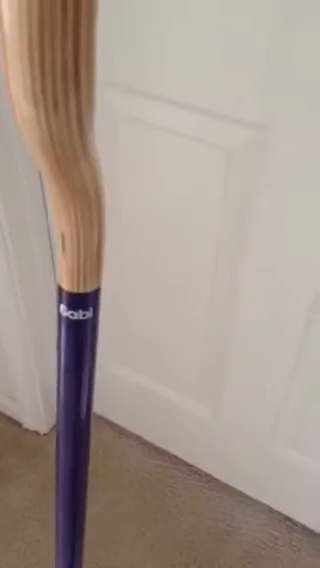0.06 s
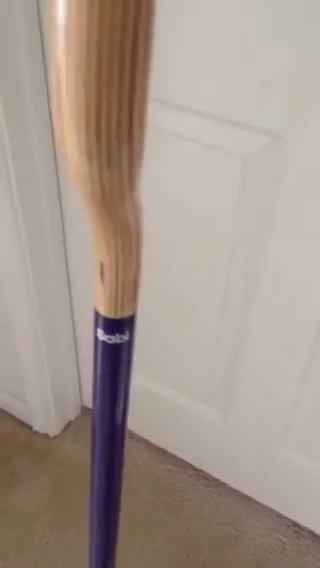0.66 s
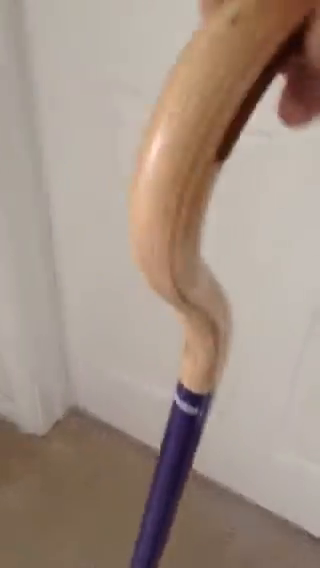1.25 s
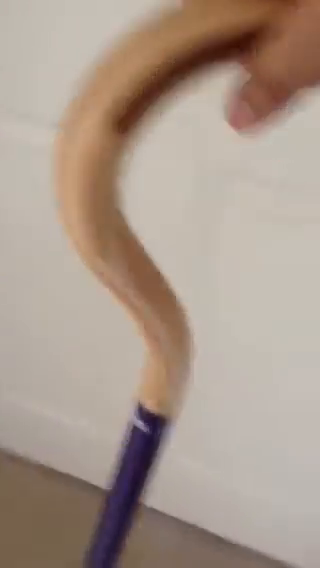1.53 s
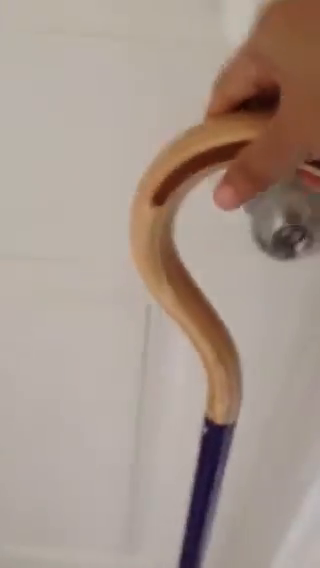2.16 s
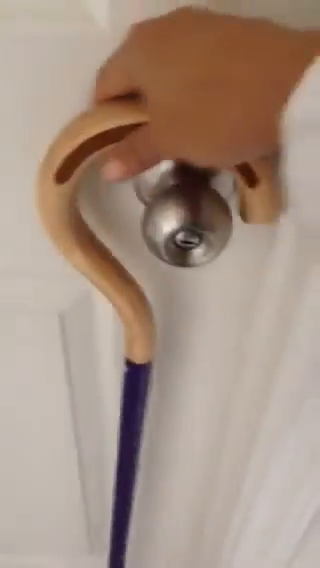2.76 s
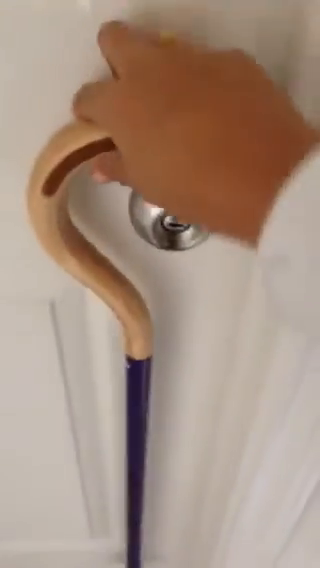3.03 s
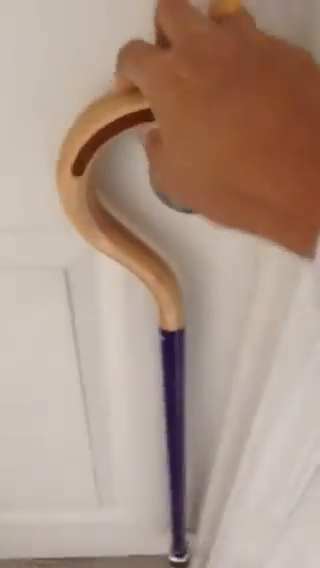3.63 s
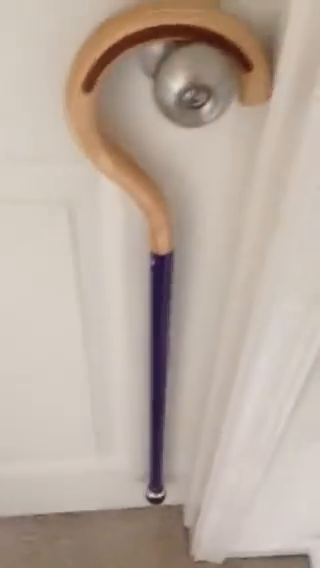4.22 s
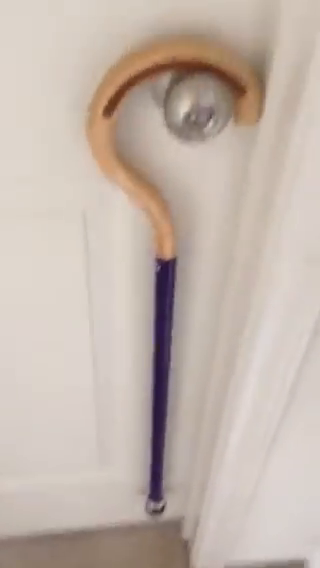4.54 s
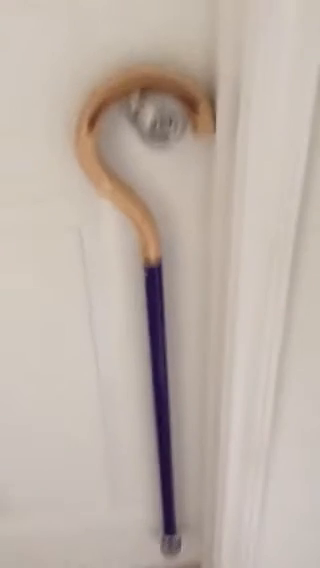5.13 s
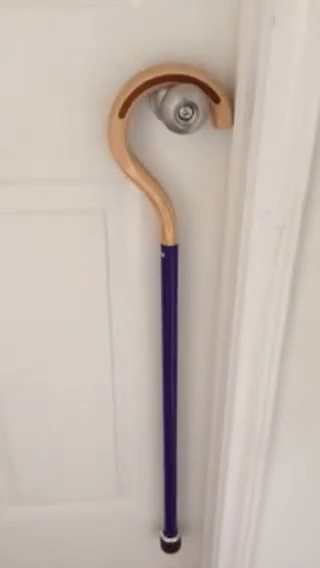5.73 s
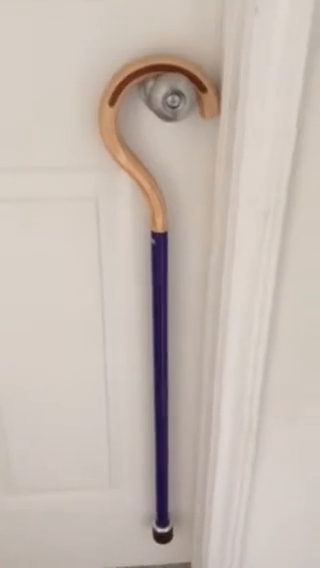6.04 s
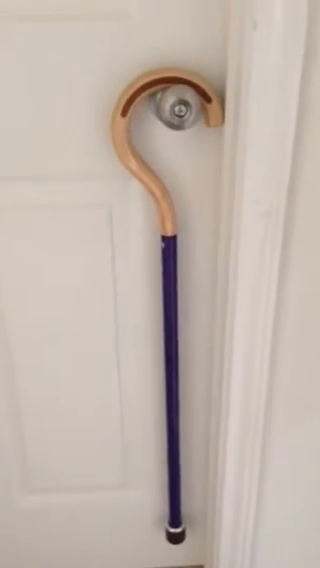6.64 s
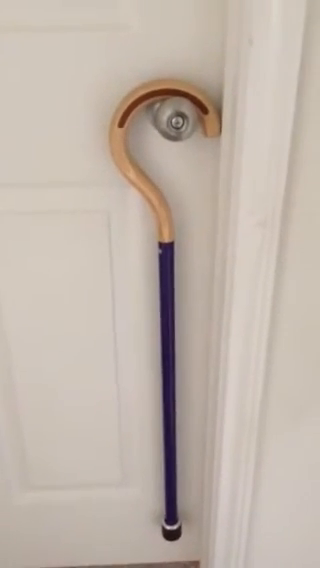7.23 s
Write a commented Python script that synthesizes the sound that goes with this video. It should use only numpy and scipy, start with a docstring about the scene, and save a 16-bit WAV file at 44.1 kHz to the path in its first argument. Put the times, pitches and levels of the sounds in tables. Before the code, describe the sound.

A wooden cane is hooked over a metal doorknob indoors, heard from close by. After a brief rustle of cloth come two firm knocks, and the hollow door bumps and rattles in its latch among lighter clacks, ending in a dull double knock. Afterwards there are only faint scuffs, small ticks and sleeve movements, with a distant household motor humming under a steady, soft hiss.

```python
"""A wooden cane is hooked over a metal doorknob in a quiet room, close to the listener.
Its handle knocks on the knob and the hollow door, which thuds and rattles in its latch.
Then the cane hangs and settles with faint scuffs and ticks.
A sleeve rustles as the arm moves, over the hum of a household motor and a soft hiss."""
import sys
import numpy as np
from scipy import signal
from scipy.fft import rfft, irfft
from scipy.io import wavfile
from scipy.ndimage import uniform_filter1d

SR = 44100
rng = np.random.default_rng(int(sys.argv[2]) if len(sys.argv) > 2 else 0)


def log_audio(samples):
    """Write samples as a 16-bit WAV file to the path given in sys.argv[1]."""
    # one column per channel
    frames = np.atleast_2d(samples).T
    # limit to full scale, then quantise
    limited = np.clip(frames, -1, 1)
    pcm = np.round(limited * 32767).astype(np.int16)
    wavfile.write(sys.argv[1], SR, pcm)


N = 325458
FORCE_HZ = np.geomspace(50, 16000, 60)  # the frequencies at which a blow's tone is set

# The tone of the wooden handle. Each row: frequency in Hz, boost or cut in dB.
HANDLE_TONE = [(450, 2), (750, 2), (1000, -.5), (1330, 4.5), (1850, -2), (2500, -2), (4200, 0.5),
               (5200, -1)]
# The door gives off little deep bass. Each row: frequency in Hz, level change in dB.
BASS_LOSS = [(65, -32.5), (115, -11.5), (155, 0)]
# The handle hits the knob. Each row: start in seconds, level in dB, corner in Hz (higher is harder),
# strength of the push, metal snap in dB, first crack in dB, ring in Hz, ring in dB, place in metres.
KNOCKS = [(2.3874, 1, 1890, 14.3, -42, 1, 1650, -12, .75), (2.6224, 2, 1640, 3.5, -34, 7, 1338, -17, 1.22),
          (2.949, -14, 2320, 5.5, -12, 4, 1380, -20, 1.04),
          (3.087, -12, 3100, 15, -24, -10, 3620, -3.5, 1.58), (3.095, -13, 2020, 6.5, 8, 4, 2130, -5, 1.4),
          (3.1881, -15.5, 1740, 5.4, -3, 5, 706, -0.5, .66),
          (3.499, -4, 1280, 9.1, -17.5, 5.5, 552, -5, 1.336),
          (3.566, -18, 900, 17, -12, -14, 1280, -5, 1.38)]

def cane_knocks(modes, ring_t60=0.16, rise_s=0.00023, wood_fall_db=25, push_hz=297, push_fall_db=32):
    """Wood hits metal: the sound weakens above the corner, and the push behind the blow adds bass."""
    out = np.zeros(N)
    for start, db, corner_hz, push, snap_db, crack_db, ring_hz, ring_db, place_m in KNOCKS:
        contact_db = contact(corner_hz, wood_fall_db, snap_db)
        push_db = push * amp(roll_off(FORCE_HZ / push_hz, push_fall_db))
        force_db = contact_db + push_db + read(HANDLE_TONE, FORCE_HZ) + read(BASS_LOSS, FORCE_HZ)
        knock = blow(modes, force_db, ring_hz, ring_db, ring_t60, crack_db, rise_s, place_m)
        add(out, start, amp(db) * knock)
    return out

def contact(corner_hz, fall_db, metal_db):
    """The tone of a hit in dB: a steep fall above the corner, plus a gently falling trace of metal."""
    body = amp(roll_off(FORCE_HZ / corner_hz, fall_db))
    metal = amp(metal_db) * np.minimum(corner_hz / FORCE_HZ, 1)
    return 20 * np.log10(body + metal)

# The notes (modes) that door and cane ring with.
# Each row: pitch in Hz, relative level in dB, seconds to fade by 60 dB (called t60).
DOOR_MODES = [(96, -15, 0.8), (131.4, -20, 0.75), (156.4, -7.5, 0.32), (176.2, -10, 0.25),
              (189.5, -21, 0.92), (219.3, -9, 0.2), (272, -24, 0.31), (284, -7.5, 0.22), (347, -34, 0.76),
              (420, -18, 0.36), (487, -21.5, 0.25), (560, -14.5, 0.26), (648, -18, 0.3), (716, -11.5, 0.16),
              (769, -21.5, 0.6), (780, -32, 0.12), (1087, -20, 0.058), (1050, -27, 0.17), (1247, -23, 0.25),
              (1324, -14, 0.18), (1407, -25, 0.13), (1480, -15, 0.073), (1530, -30, 0.17),
              (1710, -13, 0.038), (1850, -18, 0.21), (1827, -10.5, 0.069), (2010, -24, 0.12),
              (2260, -18, 0.064), (2760, -21, 0.073), (3400, -18, 0.1), (4020, -18, 0.12)]

def door_modes(t, swell_cycles=1.0):
    """The hollow door's ringing notes, one per row; each needs about a cycle to get going."""
    return np.array([(-1) ** k * amp(db) * ring(t, hz, t60) * (1 - np.exp(-t * hz / swell_cycles))
                     for k, (hz, db, t60) in enumerate(DOOR_MODES)])

def mode_shares(place_m, depth=0.25):
    """A note is stronger or weaker depending on where along its wave the blow lands."""
    wavelength_m = 8 / np.sqrt(np.transpose(DOOR_MODES)[0])
    return 1 + depth * np.cos(2 * np.pi * place_m / wavelength_m)

# Single echoes off the door frame and wall. Each row: delay in seconds, gain.
ECHOES = [(.0067, 0.077), (.0089, 0.34), (0.0126, .22)]
# The edges, in Hz, of the broad bands in which the ringing notes share out a blow's energy.
BAND_EDGES_HZ = [100, 330, 900, 2000, 3500, 7000, 15000]

def blow(modes, force_db, ring_hz, ring_db, ring_t60, crack_db, rise_s, place_m):
    """One hit sets off a crack, a short ring, the door's notes and a noisy tail; its energy is 1."""
    size = modes.shape[1]
    t, hz = np.arange(size) / SR, np.fft.rfftfreq(size, 1 / SR)
    response = mode_shares(place_m) @ modes + amp(ring_db) * ring(t, ring_hz, ring_t60) + noisy_tail(t)
    response *= 1 - np.exp(-t / rise_s)  # a glancing touch builds up gradually
    for delay_s, gain in [(0, 1), *ECHOES]:
        add(response, delay_s, [gain * amp(crack_db)])
    # even out the bands, so that the force alone sets the broad tone
    power = abs(rfft(response)) ** 2
    band_levels = [(np.sqrt(low * high), 10 * np.log10(power[(hz > low) & (hz < high)].mean()))
                   for low, high in zip(BAND_EDGES_HZ, BAND_EDGES_HZ[1:])]
    force = pulse(np.transpose([FORCE_HZ, force_db - read(band_levels, FORCE_HZ)]))
    return unit(signal.fftconvolve(response, force))

def pulse(tone, lag_s=0.00394, bend_hz=350, size=4096):
    """A sharp pulse with the given tone; its bass comes late, because slow bending waves carry it."""
    hz = np.fft.fftfreq(size, 1 / SR)
    log_gain = np.log(amp(read(tone, abs(hz))))
    log_spectrum = np.conj(signal.hilbert(log_gain))  # packs the energy right after the start
    lag_phase = 2 * np.pi * lag_s * bend_hz * np.arctan(hz / bend_hz)
    return np.fft.ifft(np.exp(log_spectrum - 1j * lag_phase)).real[:size // 2]

# The door bumps to and fro in its frame.
# Each row: start in seconds, level in dB, corner in Hz, pitch in Hz, ring at that pitch in dB.
THUDS = [(2.9147, -6, 670, 493, 10), (2.924, -3.5, 400, 201, 7), (2.943, -4.5, 275, 172, -3),
         (2.993, -8.5, 323, 183, 0), (3.063, -16, 290, 230, -8), (3.107, -13, 970, 405, -0.5),
         (3.129, -10, 460, 232, -1), (3.172, -14, 272, 234, -5), (3.206, -12.5, 217, 146, -3),
         (3.270, -26, 830, 700, -9), (3.2828, -15, 510, 228, -19), (3.570, -10.5, 264, 104, -2),
         (5.242, -27.5, 824, 187, 13)]

def door_thuds(modes, ring_t60=0.084, crack_db=7, rise_s=0.0002, place_m=1.254):
    """Soft bumps: a dull sound from below the pitch up to the corner, with a trace of rattle."""
    out = np.zeros(N)
    for start, db, corner_hz, pitch_hz, ring_db in THUDS:
        low_cut_db = roll_off(0.46 * pitch_hz / FORCE_HZ, fall_db=13) + read(BASS_LOSS, FORCE_HZ)
        force_db = contact(corner_hz, fall_db=28, metal_db=-42) + low_cut_db
        thud = blow(modes, force_db, pitch_hz, ring_db, ring_t60, crack_db, rise_s, place_m)
        add(out, start, amp(db) * thud)
    return out

# The tone of a click. Each row: frequency in Hz, relative level in dB.
CLICK_TONE = [(50, 6), (100, 17), (180, 22), (550, 22.5), (1300, 9.5), (2600, 1), (5000, -6), (10000, -1),
              (15000, -5)]
# Clicks of latch and knob.
# Each row: start in seconds, level in dB, tilt in dB per octave, ring in Hz, first crack in dB.
CLICKS = [(2.832, -22, 2, 573, -1), (2.9518, -6, 0.3, 1320, 7.5), (3.063, -19, 1.5, 1635, -11)]

def latch_clicks(modes, ring_db=-10, ring_t60=0.085, rise_s=0.00043, place_m=1.13):
    """Metal meets metal in sharp clicks that reach the top of the treble."""
    out = np.zeros(N)
    for start, db, tilt, ring_hz, crack_db in CLICKS:
        force_db = tilted(CLICK_TONE, tilt)
        click = blow(modes, force_db, ring_hz, ring_db, ring_t60, crack_db, rise_s, place_m)
        add(out, start, amp(db) * click)
    return out

# The tone of a scuff. Each row: frequency in Hz, relative level in dB.
SCUFF_TONE = [(65, -31), (180, -15), (330, 11), (550, 0.5), (1300, -0.5), (5000, -7.5), (10000, -13),
              (15000, -10)]
# The cane is handled and settles.
# Each row: start in seconds, level in dB, tilt in dB per octave, ring in Hz, rise time in seconds.
SCUFFS = [(1.92, -31, -5, 826, 0.0022), (3.786, -28.5, 1.5, 2300, .0003), (5.029, -26, 2, 996, 0.011),
          (5.058, -23.5, -4, 630, 0.003), (5.073, -23, -2, 490, 0.0031), (5.787, -28, 1, 1140, 0.0036),
          (6.776, -28, 2, 2760, 0.017)]

def cane_scuffs(modes, ring_db=3, ring_t60=0.031, crack_db=-13, place_m=0.79, low_cut_hz=130):
    """Faint, glancing touches that swell quickly and hardly crack."""
    out = np.zeros(N)
    for start, db, tilt, ring_hz, rise_s in SCUFFS:
        force_db = tilted(SCUFF_TONE, tilt)
        scuff = blow(modes, force_db, ring_hz, ring_db, ring_t60, crack_db, rise_s, place_m)
        add(out, start, amp(db) * scuff)
    return signal.sosfilt(signal.butter(2, low_cut_hz, "high", fs=SR, output="sos"), out)

# Light touches on the knob. Each row: start in seconds, peak level in dB, pitch in Hz.
TICKS = [(2.388, -44, 5740), (2.398, -47, 5730), (2.450, -49, 5900), (2.450, -51, 11500),
         (2.636, -45.5, 8500), (2.831, -54, 9500), (2.8305, -45, 13600), (2.954, -36, 12900),
         (3.059, -43, 12800), (3.088, -36, 4580), (3.096, -43, 8900), (3.098, -43, 11500),
         (3.099, -40, 4630), (3.788, -50, 9050), (5.790, -46.5, 8940)]

def knob_ticks(t60=0.032, spread=0.057, count=10):
    """A touch rings a tight cluster of high notes in the knob's metal shell."""
    out, t = np.zeros(N), np.arange(SR // 10) / SR
    for start, db, hz in TICKS:
        pitches = hz * (1 + spread * rng.uniform(-1.16, 1, count))
        cluster = sum(ring(t, pitch, t60) for pitch in pitches)
        add(out, start, amp(db) * cluster / abs(cluster).max())
    return out

# The tone of rubbing cloth. Each row: frequency in Hz, relative level in dB.
CLOTH_TONE = [(60, -66), (110, -35), (145, 7.5), (190, -16), (320, 6.5), (550, 0), (840, 6.5), (1300, 2),
              (2200, 1), (5000, 0), (10000, -1.5), (15000, -0.5)]
# Strokes of the sleeve. Each row: fastest moment in seconds, half length in seconds, level in dB,
# level of the low body against the high hiss in dB.
STROKES = [(0.797, 0.043, -68.5, 8.5), (1.504, 0.048, -42.5, 0.5), (2.232, 0.042, -57.5, -2.5),
           (2.788, 0.028, -52.5, 4), (3.907, 0.077, -58, 4), (4.113, 0.038, -57.5, 4.5),
           (4.34, 0.26, -64, -2), (4.765, 0.051, -50, -3.5), (5.065, 0.039, -59, 6.5),
           (5.215, 0.066, -58, 0.5), (5.486, 0.13, -57.5, -3)]

def sleeve(grain_db=0.6, body_hz=1800, drag_lag_s=0.17, drag_half_s=0.25, drag_db=-18.5):
    """Fibres slip past each other in a grainy hiss; a fainter drag of loose cloth trails each stroke."""
    t = np.arange(N) / SR
    cloth = noise(CLOTH_TONE)
    grain = evened(uniform_filter1d(rng.standard_normal(N), size=130))
    rub = evened(cloth * amp(grain_db * grain))
    body = signal.sosfiltfilt(signal.butter(2, body_hz, fs=SR, output="sos"), rub)
    hiss_power, body_power = np.zeros(N), np.zeros(N)
    for peak_s, half_s, db, body_db in STROKES:
        stroke = np.exp(-0.5 * ((t - peak_s) / half_s) ** 2)
        drag = amp(drag_db) * np.exp(-0.5 * ((t - peak_s - drag_lag_s) / drag_half_s) ** 2)
        level = amp(db) * np.hypot(stroke, drag)
        hiss_power += level ** 2
        body_power += (level * amp(body_db)) ** 2
    return np.sqrt(hiss_power) * (rub - body) + np.sqrt(body_power) * body

# The tones of the nearby scatter and the longer tail. Each row: frequency in Hz, relative level in dB.
SCATTER_TONE = [(100, 24), (300, 6), (600, 11.5), (1200, 10), (3000, 8.5), (14000, 9.5)]
TAIL_TONE = [(100, 1), (250, -7), (500, 2.5), (900, -2.5), (1800, -7), (5000, -1.5), (14000, -11)]
# How long the noisy tail after each blow takes to fade; its lowest bass and highest hiss linger longest.
# Each row: frequency in Hz, seconds to fade by 60 dB.
TAIL_T60 = [(100, 1.3), (260, 0.6), (700, 0.3), (1800, 0.49), (5000, 0.46), (14000, 2.8)]

def noisy_tail(t, near_db=-2, near_t60=0.11, tail_db=4.0, rise_s=0.0017):
    """Sound scatters off the door and frame close by, then a longer tail of noise fades away."""
    near = fading_noise(t, SCATTER_TONE, [(0, near_t60)])
    tail = fading_noise(t, TAIL_TONE, TAIL_T60) * (1 - np.exp(-t / rise_s))
    return amp(near_db) * near + amp(tail_db) * tail

def fading_noise(t, tone, fade_times):
    """Noise whose bands each fade at their own speed."""
    hz, times, bands = signal.stft(rng.standard_normal(len(t)), SR, nperseg=256)
    t60 = read(fade_times, hz)[:, None]
    bands *= amp(read(tone, hz)[:, None] - 60 * times / t60)
    bands *= np.sqrt(np.log(1e6) / (t60 * SR))  # a longer fade gains no extra energy
    return signal.istft(bands, SR, nperseg=256)[1][:len(t)]

# The motor's harmonics. Each row: multiple of the motor's pitch, level in dB.
HARMONICS = [(3, -87.5), (4, -84), (6, -90), (8, -82), (9, -86), (11, -82.5), (12, -94)]
# Two more form standing waves, whose loud and quiet spots the listener passes going to the door and
# away. Each row: time in seconds, level of the 5th harmonic in dB, level of the 10th in dB.
APPROACH = [(0.1, -67.5, -77), (0.96, -66.5, -80), (1.57, -67, -72.5), (2.2, -71.5, -81.5)]
RETREAT = [(3.9, -74, -82), (4.69, -70.5, -78), (6.08, -74, -68), (7.2, -74, -69)]

def motor_hum(motor_hz=59.15, waver_db=1.8):
    """A distant motor hums at multiples of one pitch, each wavering a little in level."""
    t, out = np.arange(N) / SR, np.zeros(N)
    times, fifth_db, tenth_db = np.transpose(APPROACH + RETREAT)
    standing = [(5, np.interp(t, times, fifth_db)), (10, np.interp(t, times, tenth_db))]
    waver_times = np.linspace(0, t[-1], 30)
    for multiple, db in HARMONICS + standing:
        waver = np.interp(t, waver_times, rng.standard_normal(len(waver_times)))
        wave = np.sqrt(2) * np.sin(2 * np.pi * (multiple * motor_hz * t + rng.random()))
        out += amp(db + waver_db * waver) * wave
    return out

# The tone of the background hiss. Each row: frequency in Hz, relative level in dB.
HISS_TONE = [(30, -25), (70, -13.5), (110, -4.5), (160, 4.5), (260, 6), (450, 3), (800, 0), (1500, -1.5),
             (4000, -4), (9000, -5.5), (15000, -8)]

def room_hiss(db=-65):
    """A soft, steady hiss fills the room."""
    return amp(db) * noise(HISS_TONE)

def noise(tone):
    """Noise with the given tone and an average (rms) level of 1."""
    gain = amp(read(tone, np.fft.rfftfreq(N, 1 / SR)))
    return evened(irfft(rfft(rng.standard_normal(N)) * gain, N))

def ring(t, hz, t60):
    """One fading note with an energy of 1."""
    return unit(np.sin(2 * np.pi * hz * t) * amp(-60 * t / t60))

def roll_off(ratio, fall_db):
    """A level in dB that is nearly flat for ratios under 1, then drops by fall_db per octave."""
    return -10 * np.log10(3 + ratio ** (fall_db / (10 * np.log10(2))))

def tilted(tone, db_per_octave):
    """A blow's tone made brighter or duller."""
    return read(tone, FORCE_HZ) + db_per_octave * np.log2(FORCE_HZ / FORCE_HZ.mean())

def read(table, hz):
    """Looks up a frequency in a table, blending between rows on a log scale."""
    row_hz, values = np.transpose(table)
    return np.interp(np.log(hz + 1), np.log(row_hz + 1), values)

def amp(db):
    """Turns decibels into a gain."""
    return 10 ** (np.asarray(db) / 20)

def evened(x):
    """Scales to an average (rms) level of 1."""
    return x / np.sqrt(np.mean(x ** 2) + 1e-20)

def unit(x):
    """Scales to an energy of 1."""
    return x / (np.linalg.norm(x) + 1e-20)

def add(mix, start_s, sound):
    """Mixes a sound in at the given time."""
    part = mix[round(start_s * SR):][:len(sound)]
    part += sound[:len(part)]

def scene(door_db=-0.5, blow_samples=16384):
    """All the sources together, the same in both channels."""
    modes = amp(door_db) * door_modes(np.arange(blow_samples) / SR)
    blows = cane_knocks(modes) + door_thuds(modes) + latch_clicks(modes) + cane_scuffs(modes)
    mono = blows + knob_ticks() + sleeve() + motor_hum() + room_hiss()
    return np.array([mono, mono])

def record(dry, top_hz=15400):
    """Cuts off the very highest treble."""
    low_pass = signal.firwin(511, top_hz, window=("kaiser", 9), fs=SR)
    return signal.oaconvolve(dry, low_pass[None], "same")

dry = scene()
out = record(dry)
log_audio(out)
```